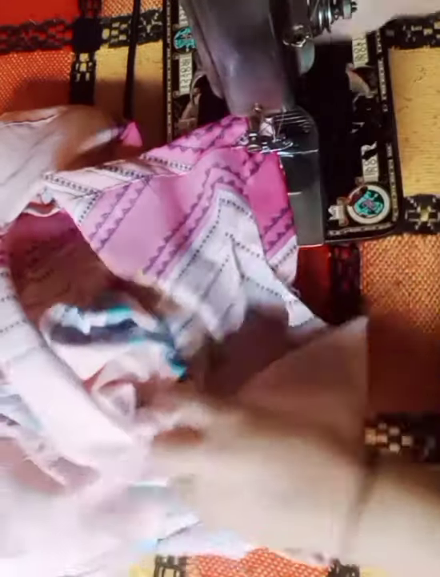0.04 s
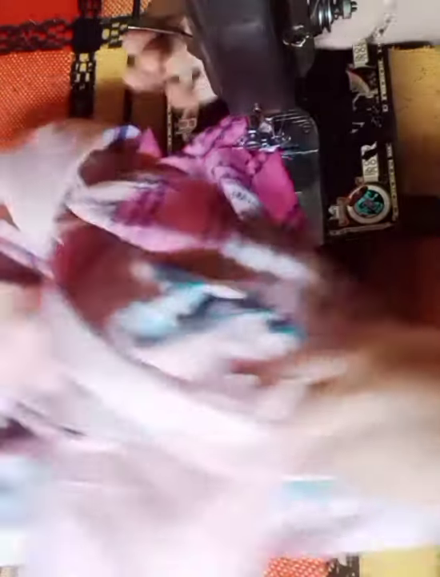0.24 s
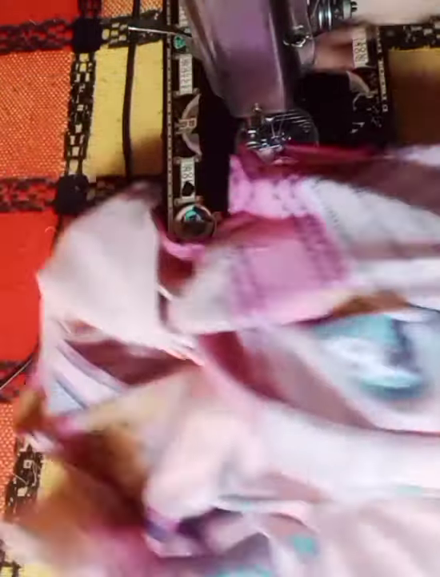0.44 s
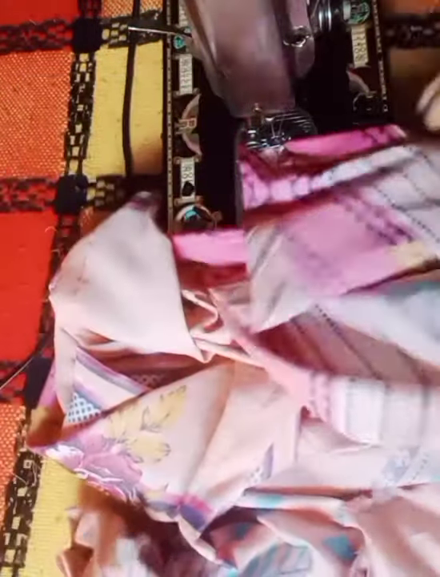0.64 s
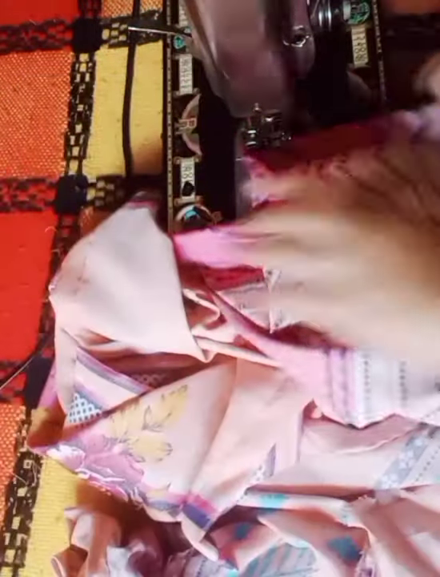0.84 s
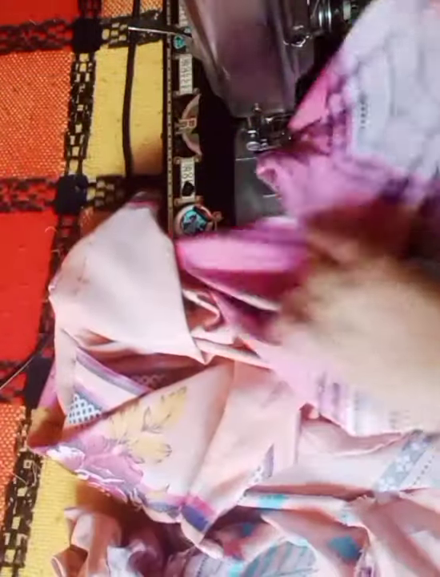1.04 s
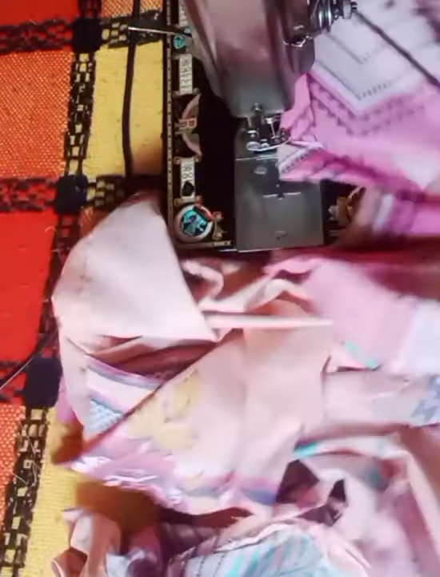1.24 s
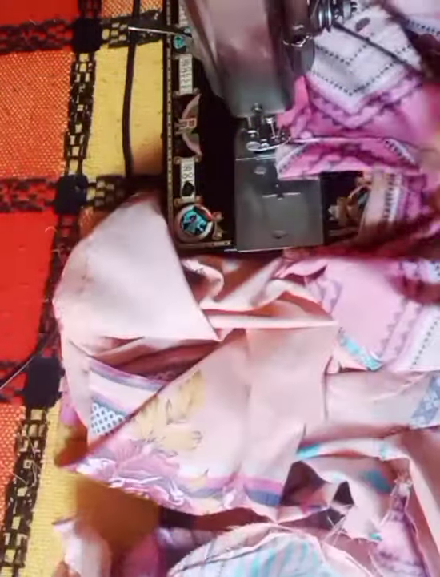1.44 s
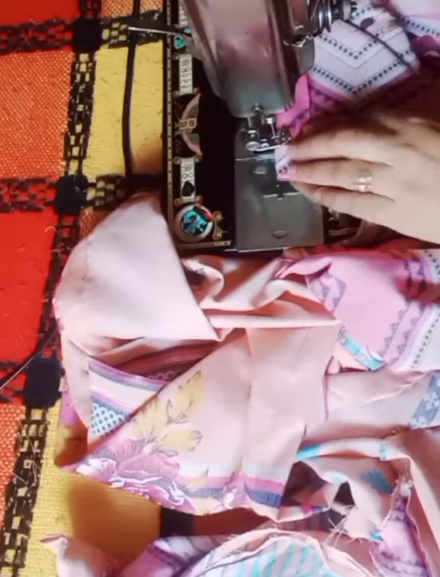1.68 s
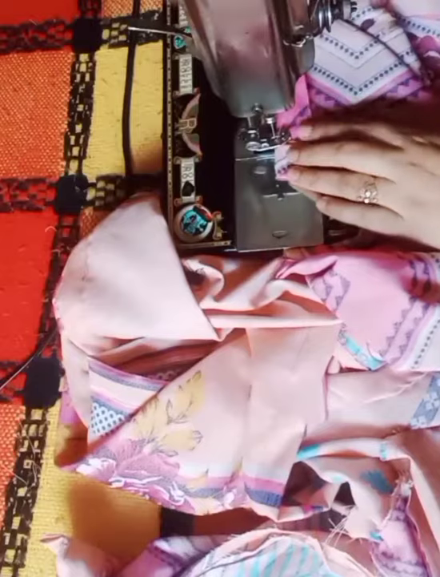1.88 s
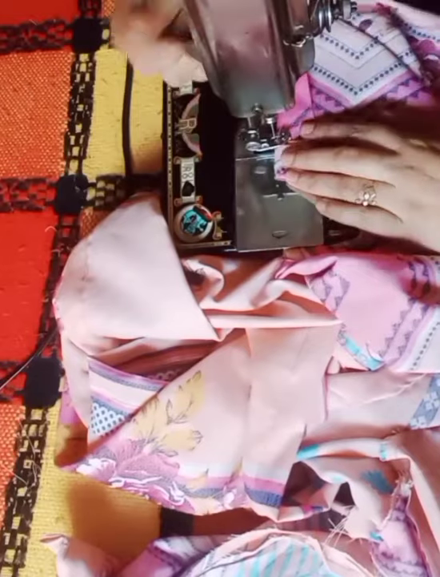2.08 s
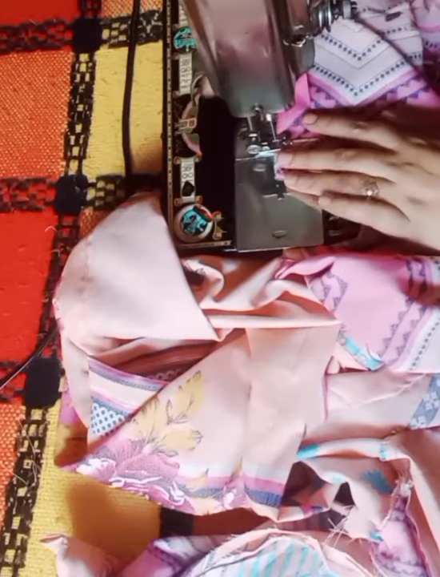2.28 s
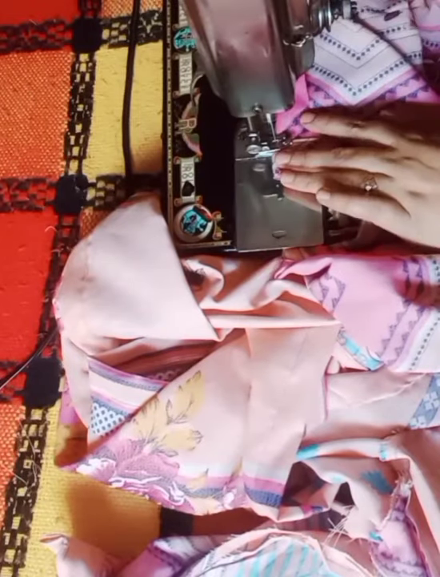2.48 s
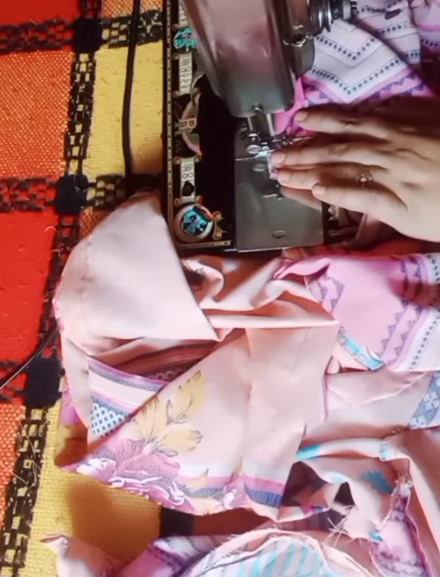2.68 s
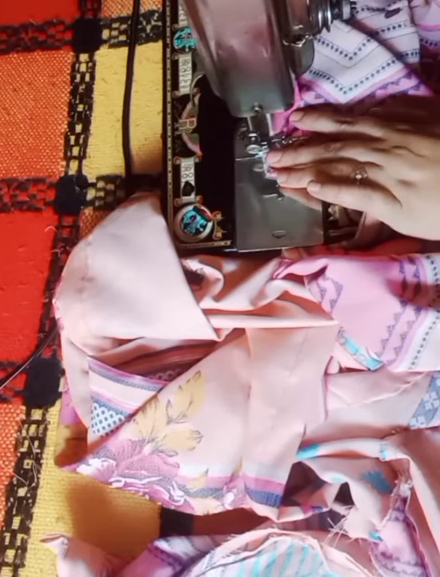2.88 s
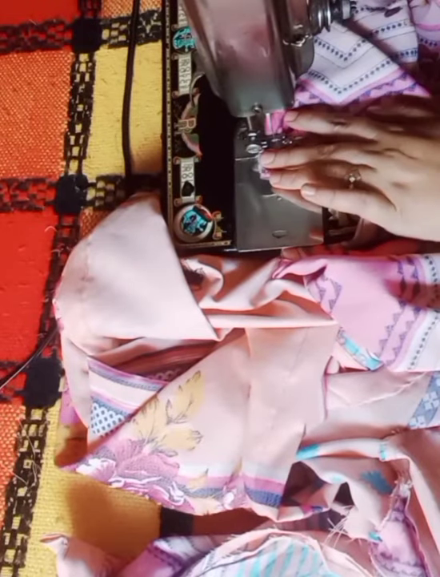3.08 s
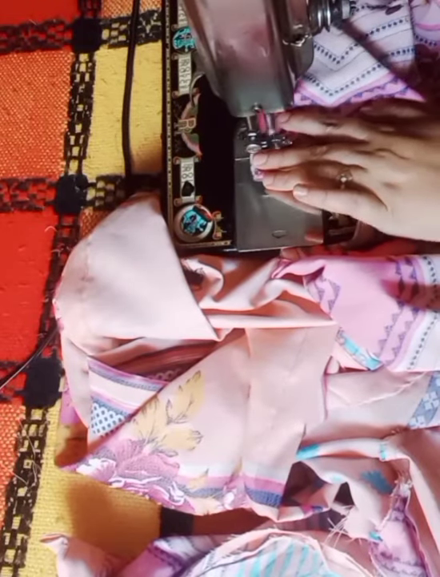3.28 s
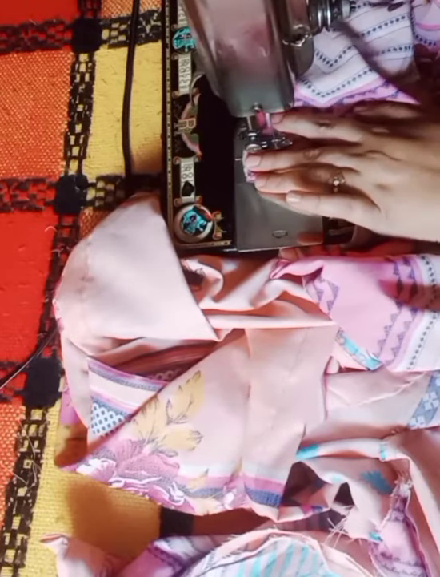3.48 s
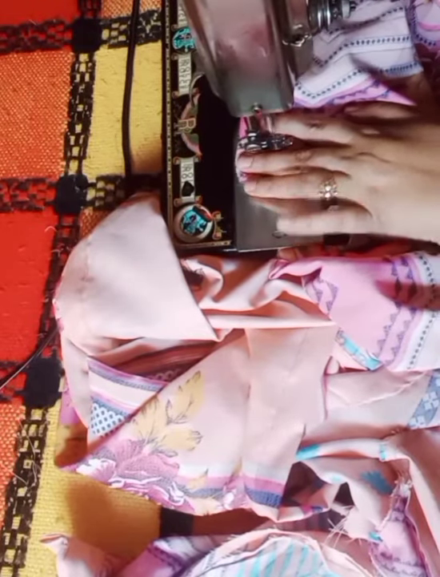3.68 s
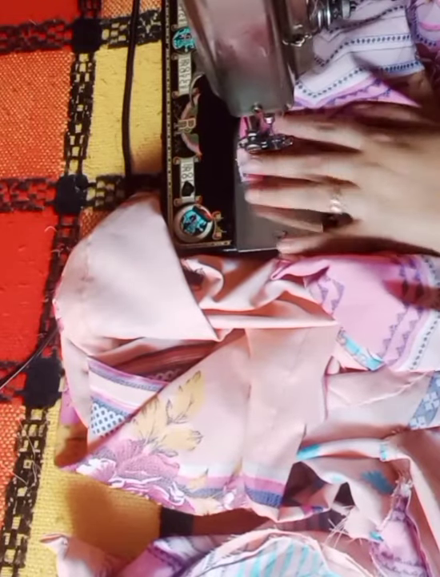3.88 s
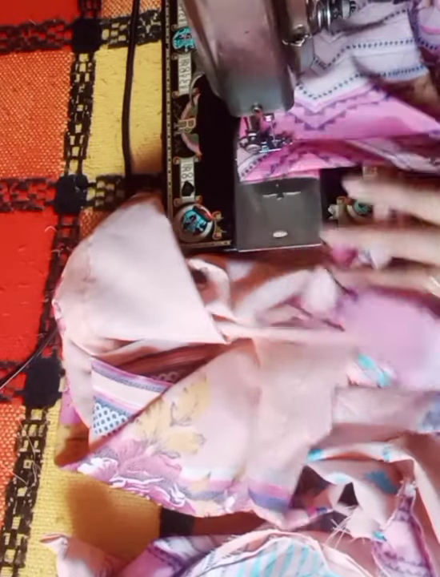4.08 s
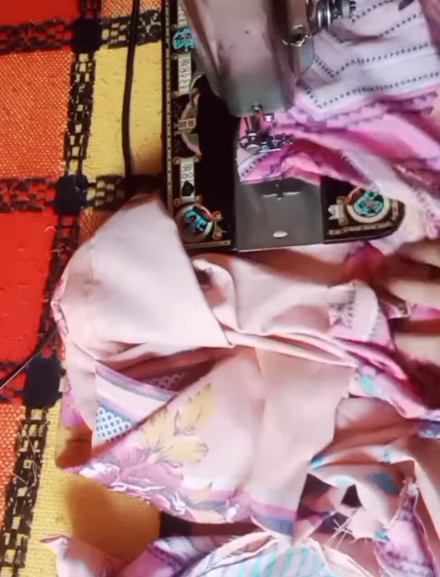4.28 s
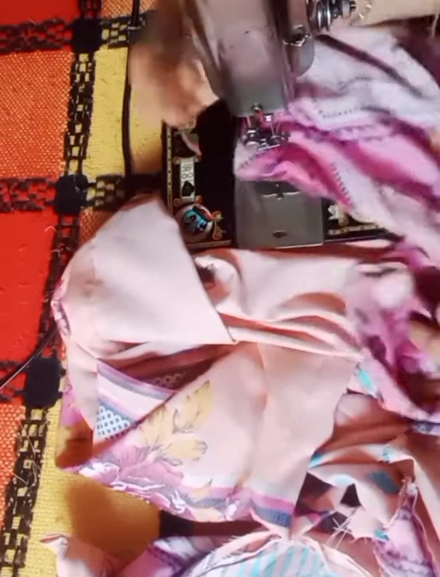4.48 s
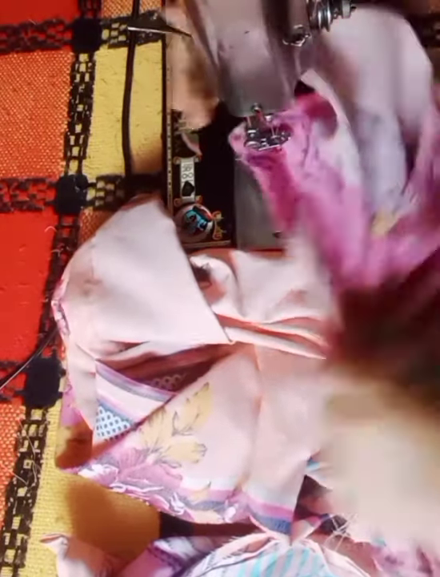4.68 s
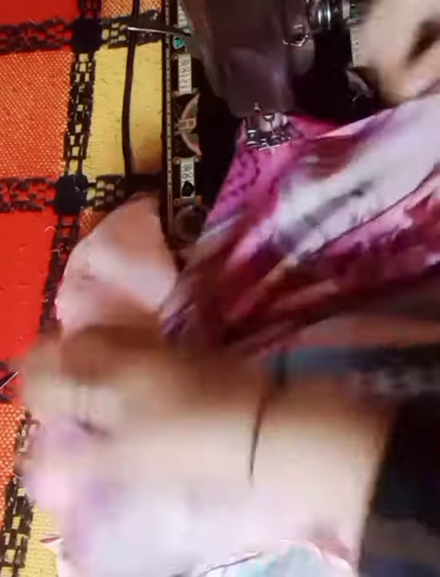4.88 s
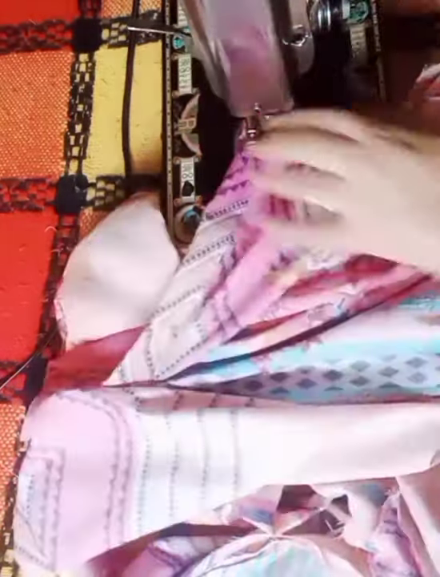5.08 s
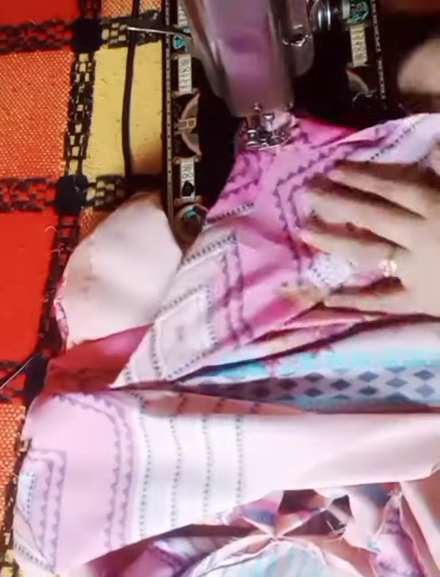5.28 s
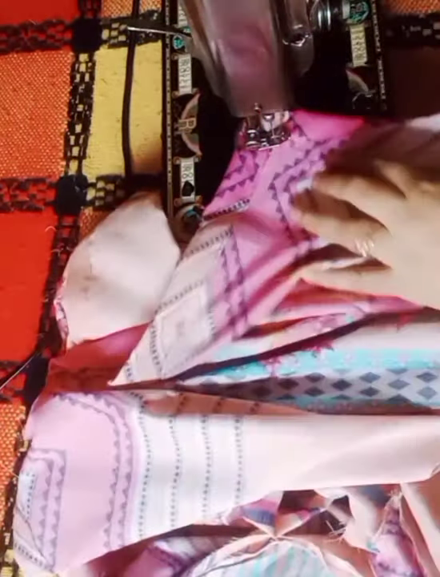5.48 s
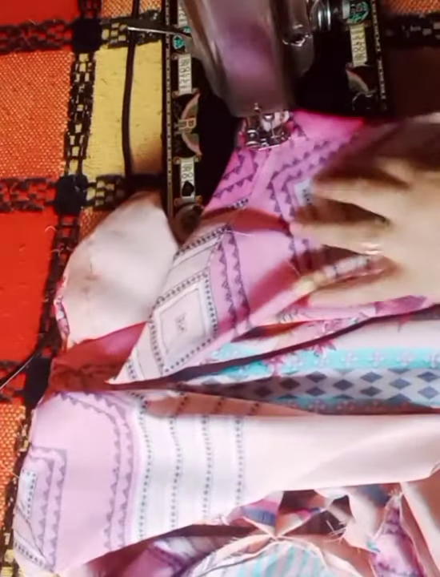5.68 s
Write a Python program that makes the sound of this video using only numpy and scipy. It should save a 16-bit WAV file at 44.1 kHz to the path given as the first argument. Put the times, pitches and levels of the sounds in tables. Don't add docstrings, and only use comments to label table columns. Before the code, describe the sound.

In a quiet bedroom with a steady low fan drone, a sewing machine lever clacks twice close by. After a pause the crank handle knocks, dry gears chirp and squeal, then a brief burst of rapid metallic stitching clatters over a woody rumble, slows and stops. Two more lever clacks follow, then only the fan. One microphone at arm's length, identical in both channels.

```python
import sys
import numpy as np
from scipy import signal
from scipy.fft import rfft, irfft, next_fast_len
from scipy.io import wavfile
from scipy.ndimage import uniform_filter1d, map_coordinates

SR = 44100
rng = np.random.default_rng(int(sys.argv[2]) if len(sys.argv) > 2 else 0)


def waveform_to_disk(signal):
    frames = np.transpose(np.atleast_2d(signal))
    scaled = np.clip(frames, -1, 1) * 32767
    samples = np.round(scaled).astype(np.int16)
    wavfile.write(sys.argv[1], SR, samples)


def how_loud(loudness_db):
    steps = np.asarray(loudness_db, float) / 20
    return 10 ** steps


N = 253134

# t/s, level/dB, shock into the base/dB
STITCHES = [(2.718, -10.5, -2.5), (2.783, -9, -19), (2.8425, -6.5, -4), (2.899, -6, -27),
            (2.9631, -7.5, -12), (3.0272, -6.5, -14), (3.092, -6, 2), (3.1566, -10.5, -2),
            (3.2282, -13, -12), (3.295, -12, -7), (3.3666, -11.5, -5.5), (3.442, -11.5, -6.5),
            (3.5234, -18, -9), (3.6103, -18.5, -8.5)]
# t/s, level/dB
EFFORT = [
    (2.2, -43),
    (2.324, -31),
    (2.5, -30),
    (2.72, -24),
    (2.95, -23),
    (3.12, -25),
    (3.3, -29),
    (3.6, -35),
    (3.85, -57.5),
]
# t/s, level/dB
SLIPS = [
    (2.357, -23.5),
    (2.374, -19.5),
    (2.415, -24.5),
    (2.466, -26.5),
    (2.492, -28),
    (2.543, -25.5),
    (2.622, -22.5),
]


def unit(x):
    return x / np.sqrt(np.mean(x ** 2) + 1e-20)


def along(points, hz):
    f, v = np.transpose(points)
    return np.interp(np.log(hz + 1), np.log(f + 1), v)


def curve(points):
    s, db = np.transpose(points)
    return np.interp(np.arange(N) / SR, s, db, -120, -120)


def wobble(rate):
    knots = rng.standard_normal(int(N * rate / SR) + 4)
    return map_coordinates(knots, [np.arange(N) * rate / SR])


def filtered(x, response):
    m = next_fast_len(N + SR // 2)
    return irfft(rfft(x, m) * response(np.fft.rfftfreq(m, 1 / SR)), m)[..., :N]


def resonant(modes):
    def response(f):
        return sum((-1) ** k * how_loud(db) * 1j * f * w / (c * c - f * f + 1j * f * w)
                   for k, (c, w, db) in enumerate(modes))
    return response


def noise(spectrum, patchy_db):
    z = signal.stft(rng.standard_normal(N), nperseg=512)[2]
    field = uniform_filter1d(rng.standard_normal(z.shape), size=5, axis=0)
    field = uniform_filter1d(field, size=8, axis=1)
    x = signal.istft(z * how_loud(patchy_db * unit(field)), nperseg=512)[1][:N]
    return unit(filtered(x, lambda hz: how_loud(along(spectrum, hz))))


def bursts(times, level_db, rise_s, fall_s):
    out, t = np.zeros(N + SR), np.arange(SR // 4) / SR
    for s, db, rise, fall in np.broadcast(times, level_db, rise_s, fall_s):
        out[round(s * SR):][:len(t)] += how_loud(db) * (1 - np.exp(-t / rise)) ** 2 * np.exp(-t / fall)
    return out[:N]


def ringing(modes, t, attack_s):
    spread = rng.normal(0, 2.1, len(modes))
    tones = sum(how_loud(db + d - 60 * t / t60) * np.sin(2 * np.pi * hz * t)
                for (hz, db, t60), d in zip(modes, spread))
    return (1 - np.exp(-t / attack_s)) * tones


def singing(hz, drift_hz, rate, flutter_db):
    pitch = hz + drift_hz * wobble(rate)
    return unit(how_loud(flutter_db * wobble(rate)) * np.sin(2 * np.pi * np.cumsum(pitch) / SR))


def stitching():
    # f/Hz, level/dB per Hz
    steel_colour = [(820, 3.5), (1400, -1), (1730, -3), (1900, 6.5), (2330, 5.5), (2480, 2.5), (3230, 4.5),
                    (3800, 1), (5270, -15.5), (5890, -9), (7450, -1), (9040, -15), (12300, -18.5),
                    (14900, -14.5), (16000, -32)]
    loose_colour = [(120, -75), (300, -33), (400, 7.5), (470, -11), (600, -11), (720, 0), (880, 8),
                    (1020, -6.5), (1100, -6), (1300, -3), (1700, -16), (2400, -35)]
    film_colour = [(9000, -40), (11500, -15), (13000, -20), (15000, 8), (16000, 1)]
    effort_db = curve(EFFORT)
    needle_s, needle_db, _ = np.transpose(STITCHES)
    shuttle_s = needle_s[:-1] + 0.713 * np.diff(needle_s)
    shuttle_db = needle_db[1:] - 5
    s, db = np.append(needle_s, shuttle_s), np.append(needle_db, shuttle_db)
    length_s = 0.015 * np.repeat([1, 0.64], [len(needle_s), len(shuttle_s)])

    grit = how_loud(2.6 * wobble(900))
    steel = noise(steel_colour, patchy_db=2.5)
    dull = filtered(steel, lambda hz: 1 / (1 + (hz / 5000) ** 8))
    bright = unit(steel - dull)
    clatter = unit(dull) * bursts(s - 0.003, db - 3.5, 0.0039, length_s * 0.56)

    snap_s = np.append(needle_s + 0.0081, shuttle_s)
    snap = bursts(snap_s, db - 11.5 + rng.normal(0, 1.5, len(s)), 0.0016, 0.0021)
    rasp = bright * (snap + bursts(s - 0.005, db - 2.5, 0.01, length_s * 0.5))

    slip_s, slip_db = np.transpose(SLIPS)
    scrape_s, scrape_db = slip_s - 0.004, slip_db - 5
    scrape = bright * bursts(scrape_s, scrape_db - 1, 0.004, 0.021)

    whirr = how_loud(effort_db - 2 + 0.87 * wobble(90)) * noise(steel_colour, patchy_db=2)
    film_db = -43 + 1.3 * (effort_db - effort_db.max())
    film = how_loud(film_db + 2.5 * wobble(25)) + bursts(scrape_s, scrape_db - 0.5, 0.006, 0.023)
    fizz = film * noise(film_colour, patchy_db=4)
    shaken = how_loud(effort_db - 12) + bursts(s - 0.002, db - 9.5, 0.0063, length_s * 0.56)
    rattle = shaken * noise(loose_colour, patchy_db=3)
    return grit * (clatter + rasp + scrape) + whirr + fizz + rattle


def squeal():
    # t/s, level/dB
    rub = [
        (2.24, -47),
        (2.36, -35.5),
        (2.435, -22),
        (2.47, -32),
        (2.51, -23),
        (2.66, -31),
        (2.688, -38),
        (2.73, -27.5),
        (2.77, -49),
    ]
    # f/Hz, pitch wander/Hz, flutter/dB, changes per s
    gear_modes = [(2210, 20, 12, 140), (2880, 24, 3, 45), (3770, 106, 9, 310), (7160, 98, 5.5, 300),
                  (2764, 30.5, -1, 44)]
    follow_db = [-8, -0.5, -12, -15, -11]
    # t/s, level/dB
    binds = [
        (2.315, -31),
        (2.385, -22.5),
        (2.42, -33),
        (2.5, -29),
        (2.646, -31),
    ]
    # f/Hz, level/dB, length/ms
    tooth = [(3685, 2.5, 7), (4395, -3.5, 9), (4000, -8.5, 8.4), (7530, -24, 14)]
    wheel = [(2173, 3.5, 23), (2790, 2, 29), (3400, -1, 24), (9120, -12, 24)]
    # t/s, f/Hz, level/dB, length/ms
    squeaks = [
        (2.21, 8800, -56, 44),
        (2.255, 3680, -35.5, 16),
        (2.296, 3740, -25, 15),
        (2.296, 7350, -32.5, 12),
        (2.33, 3600, -33, 21),
        (2.47, 5640, -34, 43),
        (2.56, 5650, -29, 8.1),
        (3.092, 1920, -25, 2.3),
        (3.161, 1895, -19, 5.2),
        (3.615, 3210, -31.5, 5.1),
    ]
    chirps = [(s, hz, db + level, ms)
              for events, modes in ((SLIPS, tooth), (binds, wheel))
              for s, db in events
              for hz, level, ms in modes]

    out, t = np.zeros(N + SR), np.arange(SR // 8) / SR
    around = t - 0.05
    for s, hz, db, ms in chirps + squeaks:
        rough = map_coordinates(rng.standard_normal((2, 80)), [[[0] * len(t), [1] * len(t)], [t * 500] * 2])
        shape = np.exp(-0.5 * ((around - rng.normal(0, 0.0034)) / (ms / 2000)) ** 2)
        glide = rng.normal(0, 7000)
        pitch = hz + glide * around + 120 * rough[1]
        strength = how_loud(db + rng.normal(0, 2.3) + 3.2 * rough[0])
        out[round((s - 0.05) * SR):][:len(t)] += strength * shape * np.sin(2 * np.pi * np.cumsum(pitch) / SR)

    rub_db = curve(rub)
    sung = sum(how_loud(rub_db + db) * singing(hz, drift, rate, flutter)
               for (hz, drift, flutter, rate), db in zip(gear_modes, follow_db))
    return out[:N] + sung


def lever():
    # t/s, level/dB, thud/dB, plate ring/dB, arm ring/dB
    presser = [
        (0.1485, -18.5, -4.5, -20, -33),
        (0.1571, -36, 5, -21, -17),
        (0.218, -15, -15, -20, -7),
        (0.9644, -34, -9, -21, -19),
        (1.149, -39.5, 3, -17, -20),
        (4.426, -18, -4, -10.5, -17),
        (4.4912, -16, -28, -10.5, -8),
        (4.902, -43, 13, -20, -20),
    ]
    handle = [
        (2.1326, -22, 3.5, -14, -26),
        (2.185, -19.5, -2, -19, -17),
        (4.7578, -38, -9, -13, -31),
    ]
    # f/Hz, level/dB per Hz
    crack_colour = [(400, 4), (1000, 6), (2000, -4.5), (2700, -3), (3700, 7.5), (4600, -6.5), (5300, -15.5),
                    (7200, -6.5), (9000, -15.5), (12000, -25.5), (15000, -19), (16000, -30)]
    # f/Hz, level/dB, t60/s
    plate_modes = [(2607, 6, 0.031)]
    arm_modes = [(3774, 5.5, 0.029), (3900, -38, 0.04), (4340, 10.5, 0.022), (3130, 3.5, 0.02),
                 (3786, 1, 0.029), (4640, -5, 0.035)]
    thud_modes = [(182, 2.5, 0.1), (151, -8.5, 0.15), (308, -14.5, 0.19), (411, -13.5, 0.13),
                  (1004, -8, 0.046), (1398, -18, 0.09)]
    contacts = presser + handle
    times, level_db = np.transpose(contacts)[:2]
    bright_db = np.repeat([-12.5, -3.5], [len(presser), len(handle)])

    def blow(db, fall_s):
        lead_in = bursts(times - 0.0066, db - 10.5, 0.0047, 0.0046)
        hit = bursts(times - 0.001, db, 0.0015, fall_s)
        bounce = bursts(times + 0.0107, db - 10, 0.001, fall_s)
        return lead_in + hit + bounce

    crack = noise(crack_colour, patchy_db=0)
    top = filtered(crack, lambda hz: 1 / (1 + (5500 / (hz + 1)) ** 8))
    cracks = unit(crack - top) * blow(level_db + 0.5, 0.0022)
    cracks = cracks + unit(top) * blow(level_db + bright_db + 6.5, 0.002)

    metal, thuds, t = np.zeros(N + SR), np.zeros(N + SR), np.arange(SR // 3) / SR
    later = np.maximum(t - 0.004, 0)
    for s, db, thud, plate, arm in contacts:
        i = round(s * SR)
        metal[i:][:len(t)] += how_loud(db + plate + 3.5) * ringing(plate_modes, t, 0.0018)
        metal[i:][:len(t)] += how_loud(db + arm - 5) * ringing(arm_modes, t, 0.002)
        thuds[i:][:len(t)] += how_loud(db + thud + 4) * ringing(thud_modes, later, 0.0076)
    return cracks, metal[:N], thuds[:N]


def bed():
    # f/Hz, width/Hz, level/dB
    base_modes = [(200.5, 14.6, 2.5), (251.6, 27, -1.5), (267.4, 15.5, 1.5), (299.5, 10.1, 1),
                  (335.5, 17, -9), (464.8, 15, -9.5)]
    # t/s, level/dB
    sways = [(0.151, -32), (0.225, -30), (2.389, -27), (2.56, -25), (2.719, -25), (2.796, -18),
             (2.918, -24), (3.028, -18), (3.11, -17), (3.192, -25), (3.252, -24), (3.389, -26.5),
             (3.54, -32.5), (4.495, -29)]
    # t/s, level/dB
    pushes = [(2.405, -22), (2.455, -29), (2.545, -20), (2.62, -28), (2.685, -12.5), (2.9, -17),
              (2.945, -14.5), (3.08, -21), (3.36, -17), (3.49, -22), (3.68, -25)]
    loaded = np.clip((np.arange(N) / SR - EFFORT[0][0]) / 0.45, 0, 1) ** 1.3
    shake = unit(filtered(rng.standard_normal(N), resonant(base_modes)))
    base = loaded * how_loud(curve(EFFORT) + 2) * shake

    ring, t = np.zeros(N + SR), np.arange(SR // 4) / SR
    struck = [(hz, db, 1.8 / width) for hz, width, db in base_modes]
    shocks = [(s, db) for s, _, db in STITCHES]
    shocks += [(s, db + 14) for s, db in SLIPS[3:]]
    for s, db in shocks:
        ring[round((s - 0.006) * SR):][:len(t)] += how_loud(db - 14.5) * ringing(struck, t, 0.0042)
    for s, db in sways:
        ring[round(s * SR):][:len(t)] += how_loud(db) * ringing([(106.8, 0, 0.42)], t, 0.0076)

    swell = bursts(*np.transpose(pushes), rise_s=0.0095, fall_s=0.047)
    panel = swell * singing(180.4, drift_hz=3.81, rate=21.89, flutter_db=1)
    return base + ring[:N] + panel


def room(x):
    # f/Hz, t60/s
    decay = [(150, 0.59), (2000, 0.29), (10000, 0.26)]
    hz, t, z = signal.stft(rng.standard_normal(SR // 2), SR, nperseg=256)
    fading = z * how_loud(-60 * t / along(decay, hz)[:, None])
    tail = signal.istft(fading, SR, nperseg=256)[1]
    return signal.fftconvolve(np.pad(x, (200, 0)), tail / np.linalg.norm(tail))[:N]


def fan():
    # f/Hz, level/dB per Hz
    air_colour = [(24, -49), (40, -6), (80, -16), (114, -1), (150, -29), (198, -5), (267, -12.5), (300, -3),
                  (437, -7), (492, -6.5), (731, -9), (1430, -13), (3500, -23.5), (4500, -34), (5850, -56),
                  (9900, -120)]
    hiss_colour = [(2650, -43), (4500, -30), (5180, -11.5), (7020, 2), (7430, 3.5), (7960, -0.5),
                   (8560, -6.5), (10300, -12.5), (13100, -14.5), (14900, -8), (15700, -17)]
    # f/Hz, width/Hz, level/dB
    drone = [(110.4, 38, -4.5), (194, 38, -4.5), (303.5, 2.6, 6.5), (423, 16, -5.5)]
    tones = unit(filtered(rng.standard_normal(N), resonant(drone))) * how_loud(1.74 * wobble(6))
    air = noise(air_colour, patchy_db=1.76) + how_loud(-5) * tones
    hiss = noise(hiss_colour, patchy_db=0.9)
    return how_loud(-40.5 + 0.5 * wobble(4.66)) * air + how_loud(-59.5) * hiss


def scene():
    cracks, metal, thuds = lever()
    gear = squeal()
    sent = how_loud(-5.5) * (cracks + thuds) + how_loud(-13) * metal + how_loud(-4.5) * gear
    mono = stitching() + gear + cracks + metal + thuds + bed() + room(sent) + fan()
    return np.array([mono, mono])


def roll_off(x):
    return signal.sosfilt(signal.butter(12, 16710, fs=SR, output="sos"), x)


def record(dry):
    heard = filtered(dry, lambda hz: (hz < 15800) * (1j * hz / (48 + 1j * hz)) ** 3)
    limit = 0.6
    mix = heard / (1 + np.abs(heard / limit) ** 4) ** (1 / 4)
    return roll_off(mix)


dry = scene()
out = record(dry)
waveform_to_disk(out)
```